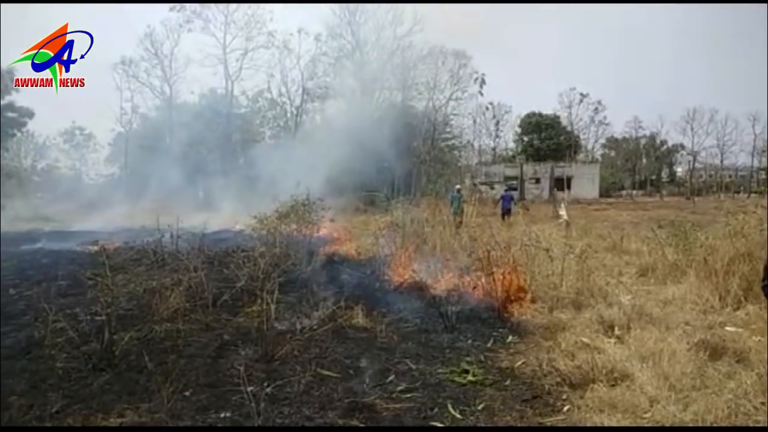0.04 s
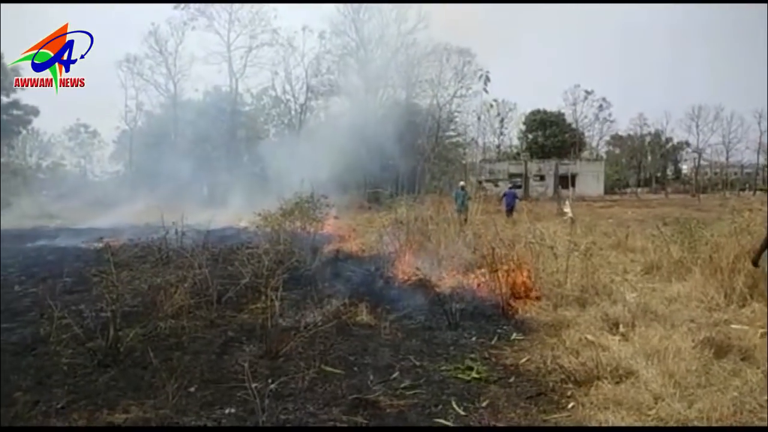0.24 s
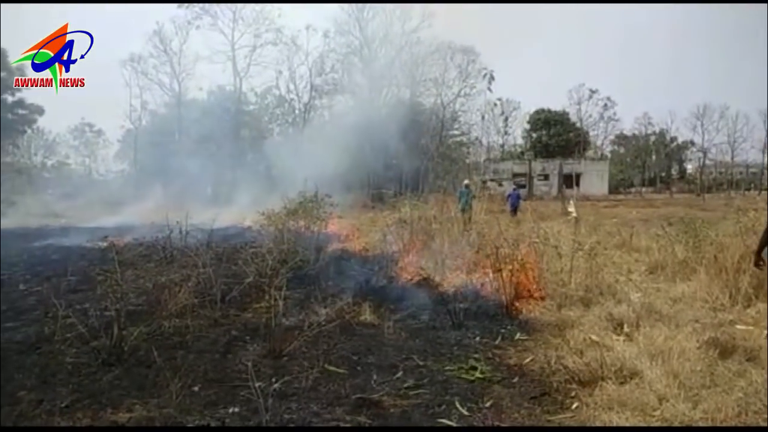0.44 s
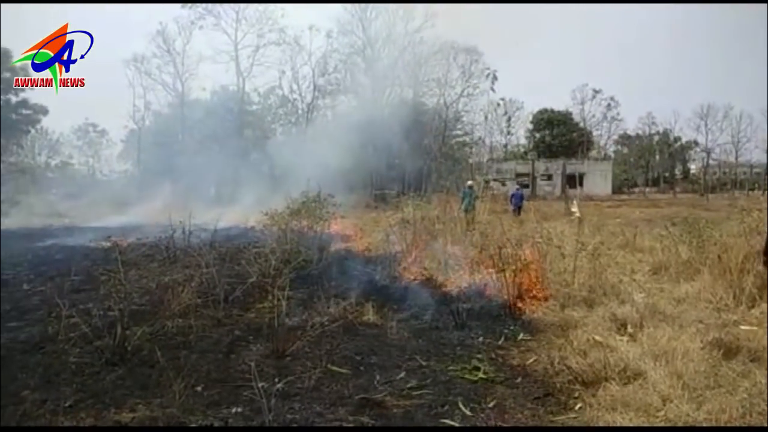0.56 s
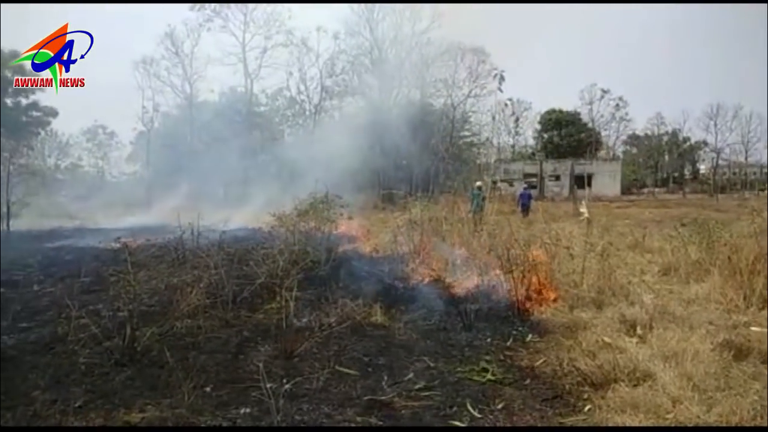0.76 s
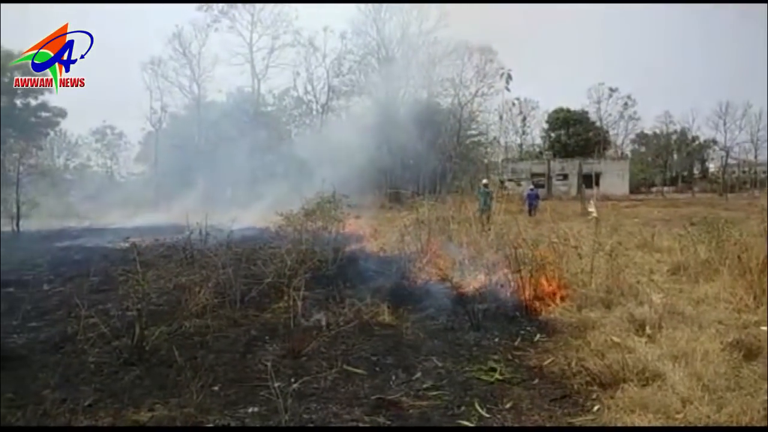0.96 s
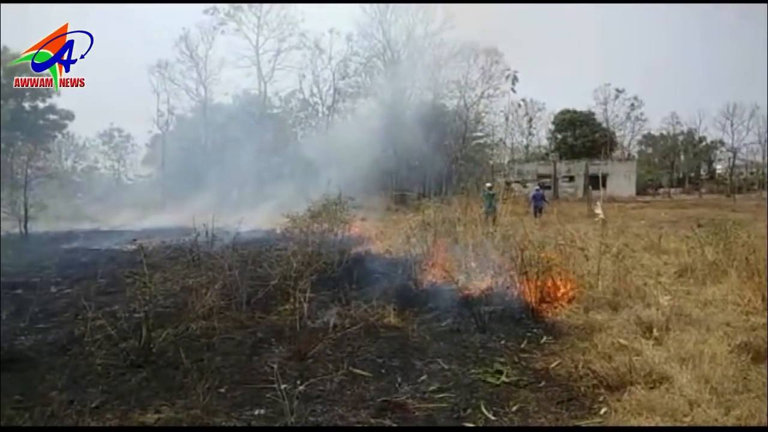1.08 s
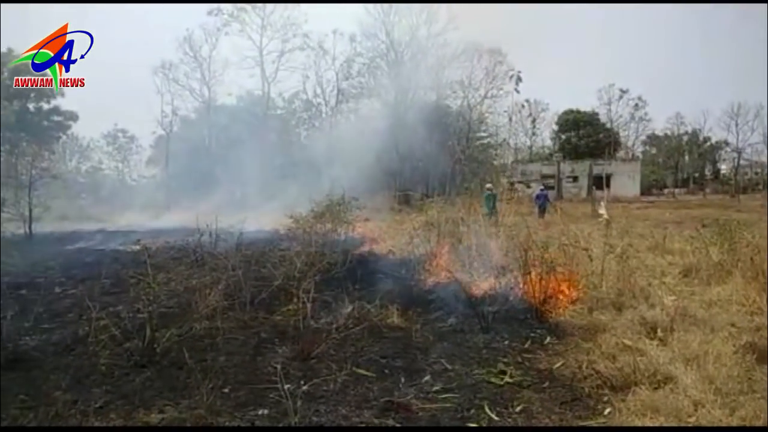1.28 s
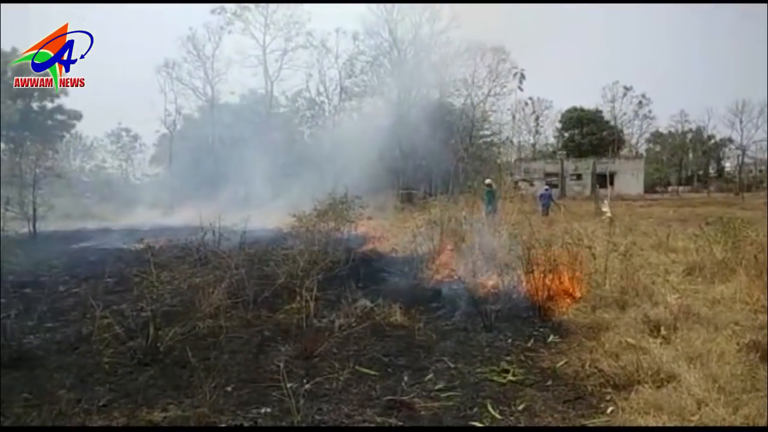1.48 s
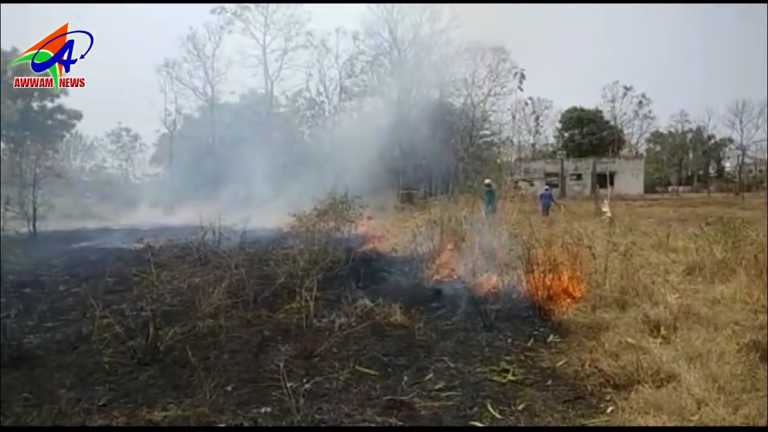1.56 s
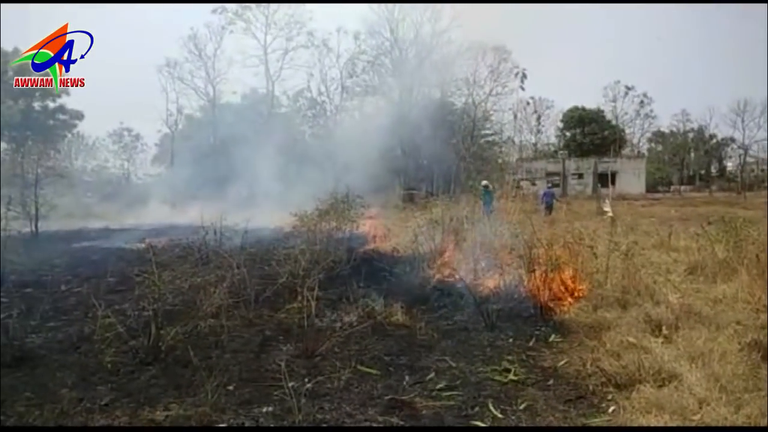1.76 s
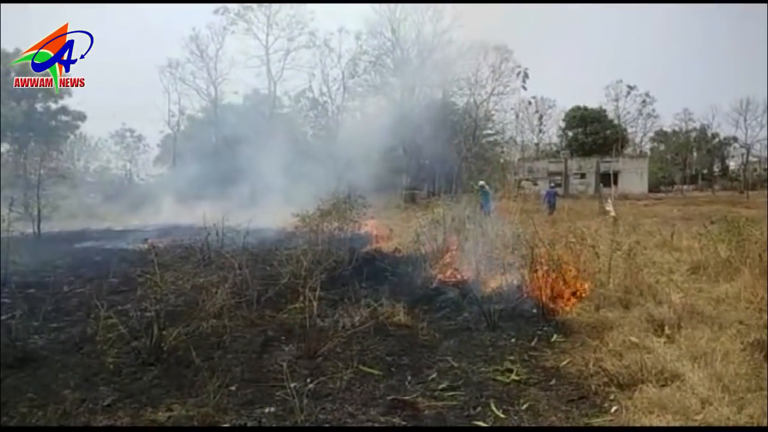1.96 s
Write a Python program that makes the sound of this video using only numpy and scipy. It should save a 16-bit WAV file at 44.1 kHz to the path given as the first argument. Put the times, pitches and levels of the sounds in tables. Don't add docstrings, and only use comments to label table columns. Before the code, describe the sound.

Dry grass and brush burn outdoors a few metres from a hand-held stereo microphone: irregular bright snaps, ticks and tiny pings over fine fizz, soft flame hiss and low wind buffeting, loudest pops around 1.5 seconds.

```python
import sys
import numpy as np
from scipy import signal
from scipy.fft import rfft, irfft
from scipy.io import wavfile
from scipy.ndimage import uniform_filter1d

SR = 44100
rng = np.random.default_rng(int(sys.argv[2]) if len(sys.argv) > 2 else 0)


def rack_gain(trim_db):
    fader = np.asarray(trim_db, float)
    return 10 ** (fader / 20)


def generate_wav(signal):
    frames = np.transpose(np.atleast_2d(signal))
    scaled = np.clip(frames, -1, 1) * 32767
    pcm = np.round(scaled).astype(np.int16)
    wavfile.write(sys.argv[1], SR, pcm)


N = 89302

USUAL_LAG, LAG_SPREAD = -4, 3.1
USUAL_BODY_DB, USUAL_BRIGHT_DB = -30.5, 6


def colour(x, points):
    p = np.array(points, float)
    f = np.maximum(np.fft.rfftfreq(2048, 1 / SR), 1)
    log_gain = np.interp(np.log(f), np.log(p[:, 0]), p[:, 1]) * np.log(10) / 20
    cepstrum = irfft(log_gain)
    cepstrum[1:1024] *= 2
    cepstrum[1025:] = 0
    impulse = irfft(np.exp(rfft(cepstrum)))
    return signal.fftconvolve(x, impulse[None], axes=1)[:, :N]


def band(x, hz, kind):
    return signal.sosfilt(signal.butter(2, hz, kind, fs=SR, output="sos"), x)


def unit(x):
    return x / np.sqrt(np.mean(x ** 2))


def walk(rate):
    k = int(SR / rate)
    held = np.repeat(rng.standard_normal(N // k + 1), k)
    return 1.3 * uniform_filter1d(uniform_filter1d(held, k), k)[:N]


# [t/s, level/dB]
BURN = [(0, -46), (.12, -49.5), (.46, -46.5), (.6, -48), (.82, -47.5), (.95, -45), (1.2, -44.5),
        (1.53, -45), (1.62, -48), (1.75, -43), (1.9, -40), (2.02, -45.5)]


def burn_db(t):
    return np.interp(t, *np.array(BURN).T)


# [f/Hz, level/dB per Hz]
HISS = [(150, -16), (250, 0.5), (971, -7.5), (2530, -4), (3170, -15), (3650, -13), (10400, 1.5), (13900, 2),
        (16000, -88)]


def hiss():
    alike_hz, flicker_db = 975, 2
    n = rng.standard_normal((3, N))
    treble = band(n[:2], alike_hz, "high") * rack_gain(flicker_db * walk(40.93))
    bass = band(n[2], alike_hz, "low") + 0.29 * band(n[:2], alike_hz, "low")
    return unit(colour(bass + treble, HISS)) * rack_gain(-0.5 + burn_db(np.arange(N) / SR))


# [f/Hz, level/dB per Hz]
RUMBLE = [(15, 7), (25, -3), (54, -23.5), (98, 1), (134, 2), (227, -3.5), (400, -15), (520, -33),
          (880, -120)]
# [t/s, left level/dB, right level/dB]
GUST = [
    (0, -7.5, -3),
    (.75, -4, -3.5),
    (.97, -3, 3),
    (1.25, -5.5, -5.5),
    (1.5, -5, 5),
    (2.02, -1, 3),
]
# [t/s, level/dB, f/Hz, length/s]
BUFFETS_LEFT = [(0.347, -42.5, 148, 0.013), (0.365, -42.5, 167, 0.0081), (0.45, -37.5, 160, 0.0057),
                (0.468, -34.5, 149, 0.021), (0.509, -37, 169, 0.019), (1.119, -41, 150, 0.017),
                (1.151, -38, 174, 0.0068), (1.247, -40.5, 188, 0.0073), (1.545, -33.5, 138, 0.0095),
                (1.78, -48, 169, 0.009), (1.917, -48.5, 163, 0.05)]
# [t/s, level/dB, f/Hz, length/s]
BUFFETS_RIGHT = [(0.053, -32, 184.4, 0.011), (0.295, -31, 153, 0.0088), (0.455, -37, 208, 0.019),
                 (1.393, -39, 141, 0.019), (1.495, -38, 140, 0.0056), (1.525, -36, 145, 0.0069),
                 (1.637, -44, 140, 0.036), (1.698, -29.5, 143, 0.008), (1.71, -31.5, 180, 0.024),
                 (1.75, -35, 155, 0.0069), (1.86, -38, 143, 0.0086), (1.91, -43.5, 119.6, 0.063),
                 (1.989, -36, 160, 0.008)]


def wind():
    rumble_db, buffet_db, wobble_rad = -50, 2.5, 1.0
    t = np.arange(N) / SR
    gust_table = np.array(GUST)
    gust = np.array([np.interp(t, gust_table[:, 0], db) for db in gust_table[:, 1:].T])
    out = unit(colour(rng.standard_normal((2, N)), RUMBLE)) * rack_gain(rumble_db + gust)
    out = out * rack_gain(np.array([3.56 * walk(25.06) for _ in range(2)]))
    for ear, table in enumerate((BUFFETS_LEFT, BUFFETS_RIGHT)):
        for s, db, hz, length in table:
            phase = 2 * np.pi * (hz * (t - s) + rng.random()) + wobble_rad * walk(70)
            swell = np.exp(-((t - s) / (0.56 * length)) ** 2)
            wave = np.sin(phase) + rack_gain(-16) * np.sin(2 * phase)
            out[ear] += rack_gain(db + buffet_db) * swell * wave
    return band(out, 60, "high")


def grains(rows):
    size, tail_db, tail_s = 768, -7.5, 0.0016
    t = (np.arange(size) - size // 2) / SR
    out = np.zeros((2, N + 2 * size))
    for s, db, hz, cycles, lag in rows:
        late = t - lag * np.array([[.5], [-.5]]) / SR
        ragged = uniform_filter1d(rng.standard_normal((2, size)), size=6) * 2.4
        ring = np.exp(-(late * hz / cycles * 2) ** 2)
        tail = (late > 0) * rack_gain(tail_db) * ragged * np.exp(-abs(late) / tail_s)
        i = int(s * SR) + size // 2
        out[:, i:i + size] += rack_gain(db) * (ring + tail) * np.cos(2 * np.pi * hz * late)
    return out[:, size:size + N]


# [t/s, level/dB, f/Hz]
PINGS = [(0.025, -23, 12400), (0.0427, -36, 10000), (0.0575, -21.5, 10140), (0.1268, -29, 9600),
         (0.1702, -28, 9050), (0.359, -29, 9500), (0.3983, -30, 9800), (0.4696, -26, 8700),
         (0.5101, -27, 10200), (0.5774, -32, 10300), (0.6141, -42, 8500), (0.633, -26, 9650),
         (0.6987, -37, 9700), (0.7064, -33, 10000), (0.7445, -29, 11200), (0.7466, -31, 9900),
         (0.7668, -27, 8700), (0.773, -34, 9500), (0.7959, -27.5, 9700), (0.799, -35, 9700),
         (0.8274, -31, 12600), (0.8628, -28, 11000), (0.8789, -32, 10600), (0.919, -24, 8800),
         (0.9502, -21, 10300), (0.9626, -24, 9200), (1.0405, -35, 10700), (1.0456, -25, 11500),
         (1.0593, -26, 9400), (1.0708, -30, 9200), (1.0816, -29, 9100), (1.1136, -31, 8800),
         (1.139, -20.5, 8700), (1.145, -27, 9150), (1.172, -24, 8800), (1.2208, -29, 10400),
         (1.2257, -22, 10200), (1.2704, -41, 11100), (1.2735, -28, 11100), (1.279, -24, 10300),
         (1.2904, -25, 9300), (1.3544, -24, 10130), (1.36, -31, 9550), (1.3792, -28, 9400),
         (1.4166, -29, 9400), (1.496, -24, 9500), (1.513, -28, 10400), (1.707, -28, 9700),
         (1.7618, -23, 10800), (1.8205, -25, 10600), (1.857, -31, 10700), (1.861, -34, 10800),
         (1.9, -23, 9900), (1.927, -21, 10100), (1.94, -26, 9300), (1.9854, -28, 9050)]
# [middle t/s, level/dB, f/Hz, length/cycles]
WHISTLE = (.185, -33, 6000, 40)


def pings():
    ping_db, cycles, fizz_per_s = -2.5, 1.84, 700
    fizz_db, spread_db, cap = -1, 5.5, 2.15
    centre_hz, octaves = 7995, 1.938
    rows = [(s, db + ping_db, hz, cycles, USUAL_LAG) for s, db, hz in PINGS]
    rows.append((*WHISTLE, USUAL_LAG))
    pool = rng.random((int(fizz_per_s * N / SR), 4))
    t = pool[:, 0] * (N - 1) / SR
    patches_db = 3.96 * walk(30.08)[(t * SR).astype(int)]
    excess_db = spread_db * np.minimum(-np.log(pool[:, 1]), cap)
    db = burn_db(t) + fizz_db + excess_db + patches_db
    hz = np.minimum(centre_hz * 2 ** (octaves * (pool[:, 2] - .5)), .33 * SR)
    lag = USUAL_LAG + 4 * LAG_SPREAD * (pool[:, 3] - .5)
    fizz = np.c_[t, db, hz, cycles + 0 * t, lag]
    return grains(rows + list(fizz))


def bursts(rows):
    lead, size = 128, 1024
    body_hz, edge_hz = 2865, 7150
    splinter_db, splinter_s, spike_spread_db = -17, 0.0012, -1.5
    lead_db, lead_s, tail_db, tail_s = -17.5, 0.0011, -20.5, 0.0027
    crack_db, body_gain_db, body_scatter_db, scatter = 4.5, 12.5, -3.5, 0.7
    k = np.arange(size) - lead
    t = k / SR
    after = rack_gain(splinter_db) * np.exp(-t / splinter_s)
    before = rack_gain(lead_db) * np.exp(-abs(t) / lead_s)
    shape = np.where(k > 0, after, before)
    tail = (k > 0) * rack_gain(tail_db) * np.exp(-t / tail_s)
    rest_gain = rack_gain(np.array([[body_scatter_db], [0], [0]]))
    out = np.zeros((3, 2, N + 2 * size))
    for s, db, body_db, bright_db, lag in rows:
        noise = rng.standard_normal((3, size))
        spikes = rack_gain(spike_spread_db * np.minimum(rng.exponential(size=size), 2))
        spikes = unit(spikes) * np.sign(noise[2])
        gains = rack_gain(db + crack_db + np.array([body_db + body_gain_db, -bright_db / 2, 0]))
        i = int(s * SR) + size - lead
        for ear in range(2):
            shift = lag * (.5 - ear)
            late = k - s * SR % 1 - shift
            crack = np.sinc(late) * np.exp(-(late / 8) ** 2)
            rest = np.roll(spikes * shape, int(shift)) + noise[ear] * (tail + scatter * shape)
            out[:, ear, i:i + size] += gains[:, None] * (crack + rest * rest_gain)
    body, middle, edge = out[:, :, size:size + N]
    middle = band(middle, [body_hz, edge_hz], "band")
    return band(body, body_hz, "low") - middle + band(edge, edge_hz, "high")


# [t/s, peak level/dB, body level/dB below the crack, brightness level/dB]
POPS = [(0.2192, -14.5, -52, 24), (0.2293, -21, -11.5, 2), (0.2531, -19, -14, -14.5),
        (0.4514, -16.5, -32, 10), (0.4812, -20.5, -41, -3), (0.4996, -11.5, -23.5, 28),
        (0.6673, -19, -43, 7), (0.7199, -14.5, -20.5, 21), (1.0241, -16.5, -41, 24),
        (1.0876, -12.5, -31, 30), (1.2028, -17, -12.5, -4.5), (1.3012, -16, -28, 3),
        (1.3185, -14.5, -42, 14), (1.4863, -10, -30, -2.5), (1.5658, -9, -27, 2), (1.5688, -14, -28, 19),
        (1.5932, -16.5, -17, 19), (1.6082, -9.5, -33, -11), (1.6102, -9, -22.5, -2), (1.6475, -13, -24, 8),
        (1.7477, -19.5, -40, 6), (1.8107, -15.5, -30, 17), (1.9573, -17.5, -20.5, 17),
        (1.9744, -13, -44, 10)]
# [t/s, peak level/dB, body level/dB below the crack, brightness level/dB]
SNAPS = [(0.1194, -19.5, -47, 19), (0.1299, -22, -24, 9), (0.1528, -17, -18.5, 6),
         (0.1557, -22.5, -39, -11), (0.1632, -23.5, -20, 4), (0.1793, -24, -40, -3),
         (0.2016, -17.5, -25.5, 34), (0.2124, -23, -40, 19), (0.2706, -26.5, -29, -17),
         (0.4175, -18, -35, 27), (0.4295, -18, -19, 21), (0.4586, -13, -25, 26), (0.7125, -27, -39, 10),
         (0.8258, -28.5, -22, -16), (0.8656, -20, -21, 26), (0.9156, -17.5, -15, 55),
         (0.9461, -21, -38, 38), (1.0527, -18, -25.5, 35), (1.256, -27, -25, -24.5),
         (1.3055, -16.5, -47, 29), (1.4795, -23, -13.5, -16), (1.6146, -20, -15, -14),
         (1.7353, -16, -26, 20), (1.8596, -30, -25, -19), (1.8844, -21, -29, 18), (1.9402, -29, -28, 5)]
# [t/s, peak level/dB]
TICKS = [(0.1041, -23), (0.1087, -29), (0.2387, -22), (0.301, -26.5), (0.328, -27), (0.388, -21.5),
         (0.4606, -18.5), (1.3684, -22.5), (1.4041, -22.5), (1.5047, -22), (1.6228, -27), (1.791, -21),
         (1.484, -11), (1.5674, -14.5), (0.224, -34), (0.345, -32)]


def crackle():
    bed_per_s, bed_db, spread_db, cap = 200, 6, 7, 1.07
    ticks = [(s, db, USUAL_BODY_DB, USUAL_BRIGHT_DB) for s, db in TICKS]
    distinct = list(POPS) + list(SNAPS) + ticks
    lags = USUAL_LAG + LAG_SPREAD * rng.standard_normal(len(distinct))
    rows = [(*row, lag) for row, lag in zip(distinct, lags)]
    pool = rng.random((int(bed_per_s * N / SR), 5))
    t = pool[:, 0] * (N - 1) / SR
    db = burn_db(t) + bed_db + spread_db * np.minimum(-np.log(pool[:, 1]), cap)
    body_db = USUAL_BODY_DB + 14 * (pool[:, 2] - .5)
    bright_db = USUAL_BRIGHT_DB + 16 * (pool[:, 3] - .5)
    lag = USUAL_LAG + 4 * LAG_SPREAD * (pool[:, 4] - .5)
    return bursts(rows + list(np.c_[t, db, body_db, bright_db, lag]))


# [middle t/s, level/dB, length/s]
RUSTLES = [(0.109, -40, .007), (0.126, -40, 0.0056), (0.149, -36, 0.0046), (.182, -41, 0.0075),
           (0.209, -43, 0.0057), (0.414, -50, .006), (.432, -39, 0.0067), (0.509, -38, 0.0078),
           (0.747, -43, .006), (.768, -36, 0.0042), (0.824, -41, 0.0036), (0.925, -43, 0.0072),
           (1.115, -35.5, 0.0041), (1.573, -36, 0.006), (1.598, -38, 0.0044), (1.927, -37, 0.0054)]


def rustles():
    t = np.arange(N) / SR
    spread_db = 4 * uniform_filter1d(rng.standard_normal(N), size=9) * 2.4
    spikes = rng.standard_normal((3, N)) * rack_gain(spread_db)
    shape = sum(rack_gain(db + 0.5) * np.exp(-((t - s) / (.5 * length)) ** 4) for s, db, length in RUSTLES)
    return unit(band(spikes[2] + .8 * spikes[:2], 5000, "high")) * shape


# [f/Hz, level/dB]
MIC = [(120, -13), (400, 0), (1000, 2), (2000, 3), (5000, -6), (7500, 1), (9500, 6.5), (14500, -4)]


def microphone(x):
    return colour(x, MIC)


# [t/s, peak level/dB, f/Hz]
KNOCKS = [
    (0.88, -36.5, 790),
    (.9165, -30, 720),
    (1.131, -36, 810),
    (1.36, -35, 735),
    (1.97, -27, 780),
]


def knocks():
    t60_s = 0.0061
    t, out = np.arange(N) / SR, 0
    for s, db, hz in KNOCKS:
        age = np.maximum(t - s, 0)
        out = out + rack_gain(db) * np.sin(2 * np.pi * hz * age) * 1000 ** (-age / t60_s)
    return band(out, 300, "high")


def scene():
    ground_s, ground_db, ground_hz, pan_db = .00145, -7, 3500, -0.9
    fire = microphone(crackle() + pings() + rustles()) + knocks() + hiss()
    d = int(ground_s * SR)
    bounce = np.pad(fire, ((0, 0), (d, 0)))[:, :N]
    fire = fire + rack_gain(ground_db) * band(bounce, ground_hz, "low")
    return fire * rack_gain(np.array([[pan_db], [-pan_db]]) / 2) + wind()


def low_pass(x):
    return signal.sosfilt(signal.butter(12, 16450, fs=SR, output="sos"), x)


def record(dry):
    top_hz, limit = 14900, .5
    notch_hz, notch_q, notch_share = 3150, 6, .6
    rounded = limit * np.tanh(dry / limit)
    x = signal.sosfilt(signal.cheby1(8, 1, top_hz, fs=SR, output="sos"), rounded)
    x = x - notch_share * signal.lfilter(*signal.iirpeak(notch_hz, notch_q, SR), x)
    return low_pass(x)


dry = scene()
out = record(dry)
generate_wav(out)
```